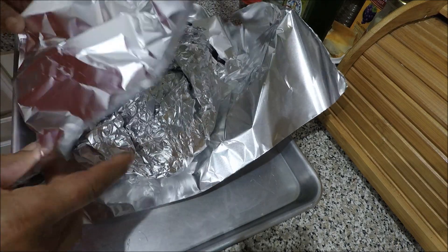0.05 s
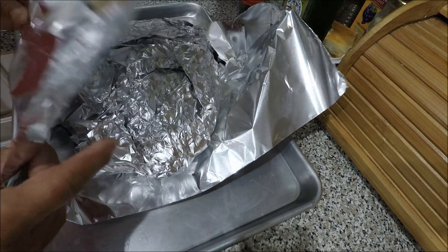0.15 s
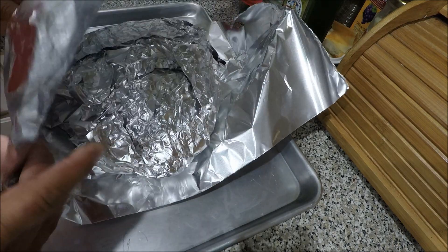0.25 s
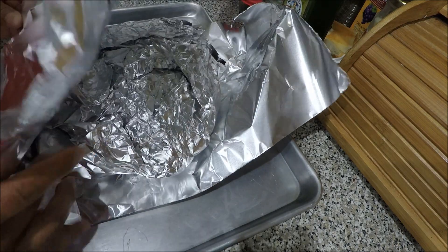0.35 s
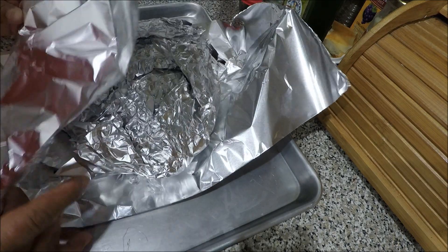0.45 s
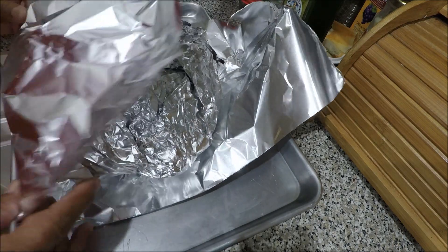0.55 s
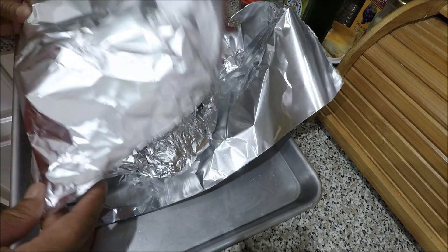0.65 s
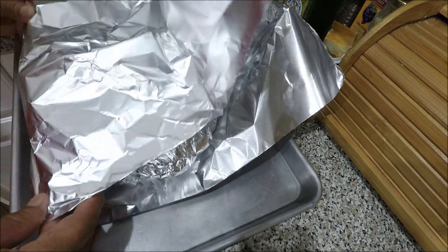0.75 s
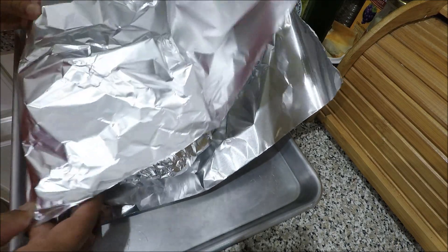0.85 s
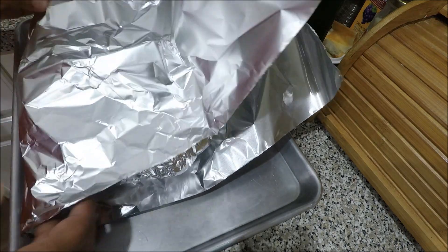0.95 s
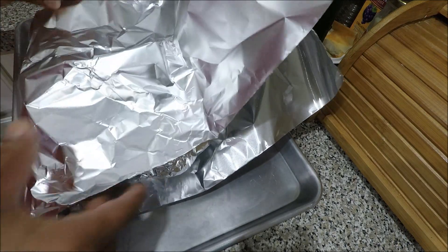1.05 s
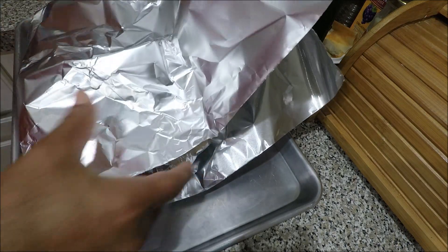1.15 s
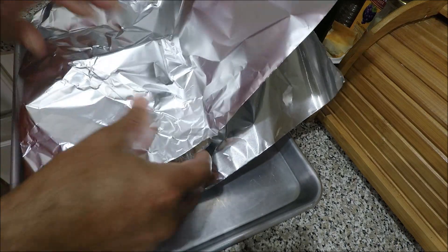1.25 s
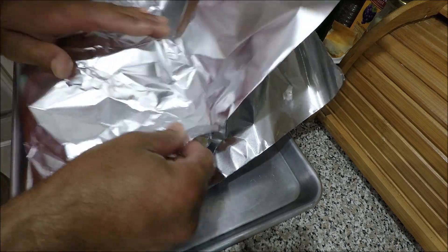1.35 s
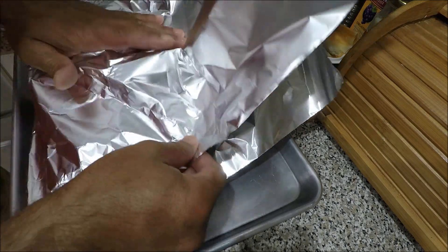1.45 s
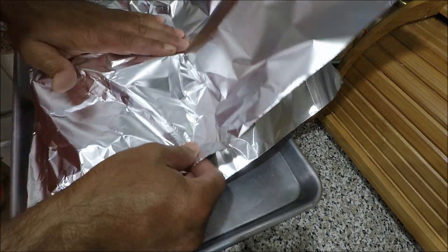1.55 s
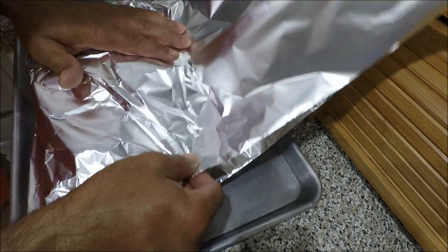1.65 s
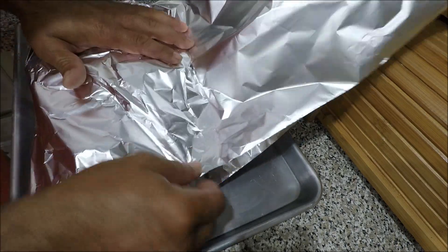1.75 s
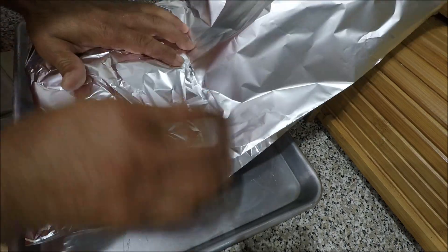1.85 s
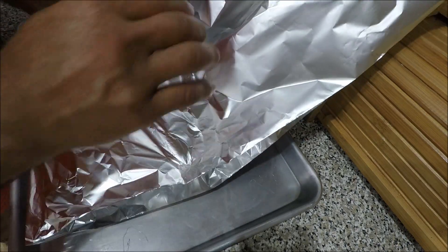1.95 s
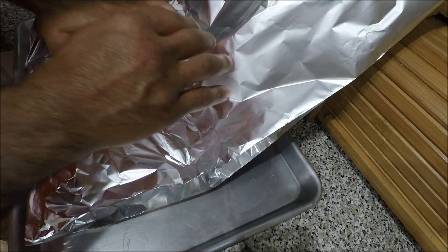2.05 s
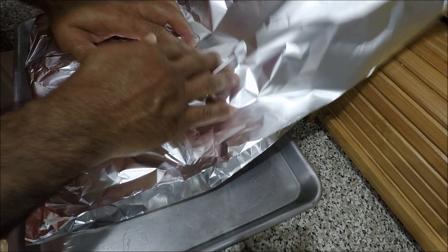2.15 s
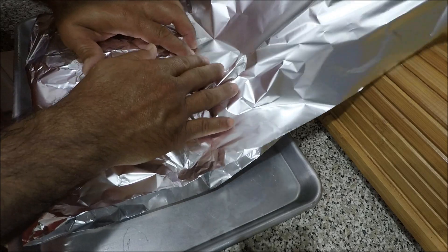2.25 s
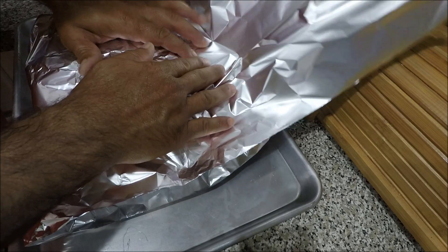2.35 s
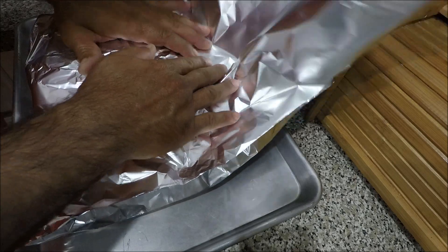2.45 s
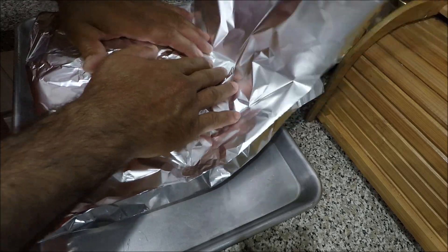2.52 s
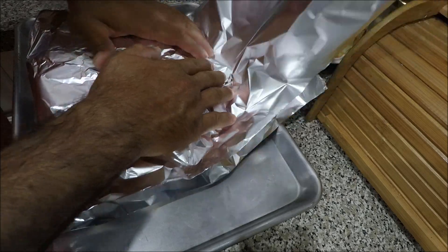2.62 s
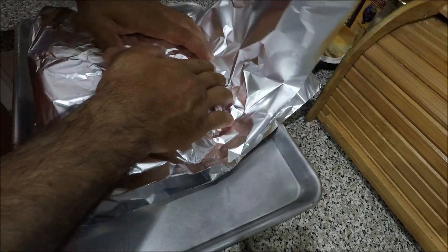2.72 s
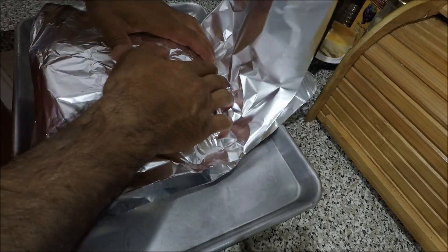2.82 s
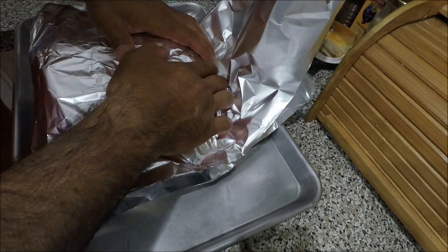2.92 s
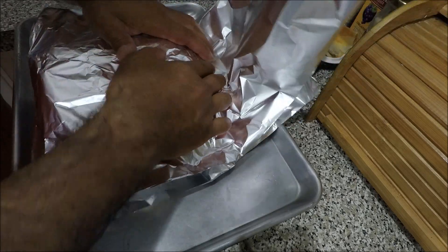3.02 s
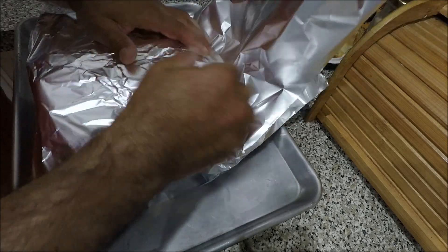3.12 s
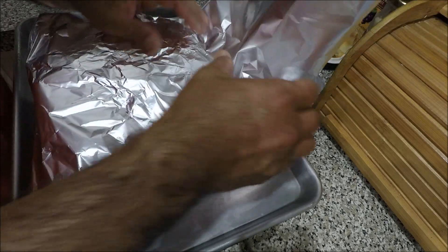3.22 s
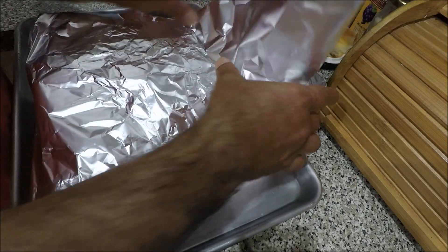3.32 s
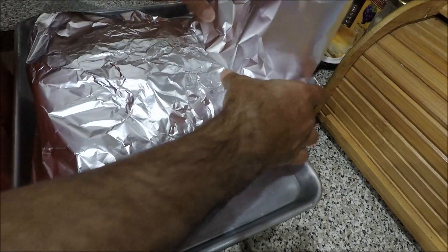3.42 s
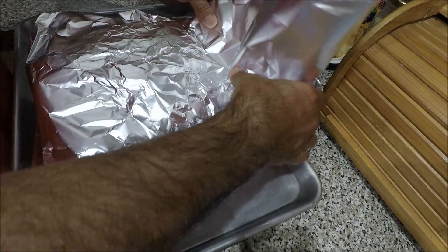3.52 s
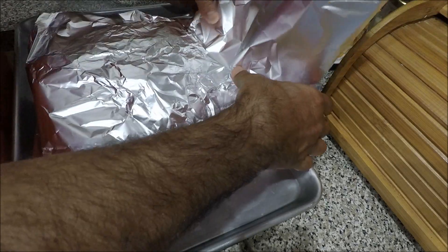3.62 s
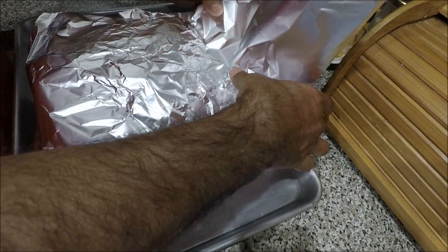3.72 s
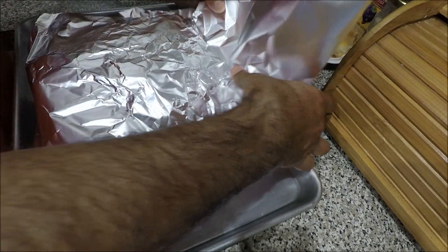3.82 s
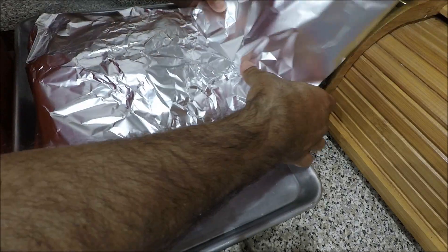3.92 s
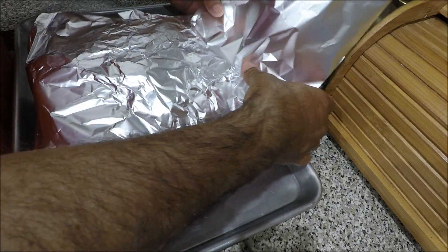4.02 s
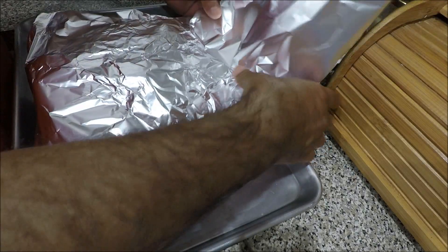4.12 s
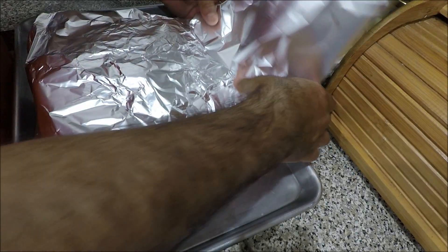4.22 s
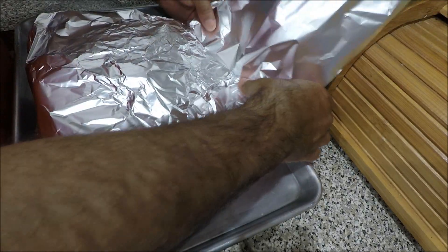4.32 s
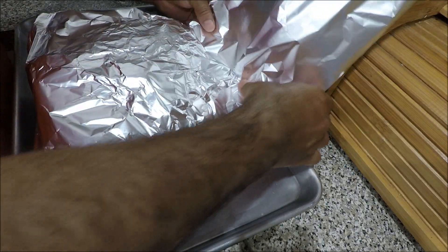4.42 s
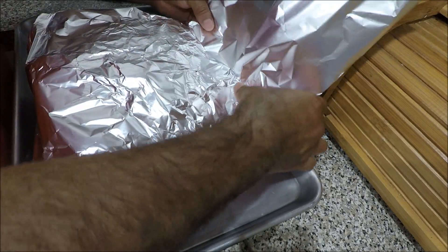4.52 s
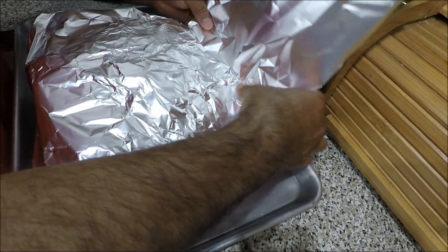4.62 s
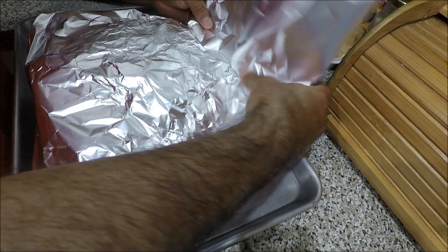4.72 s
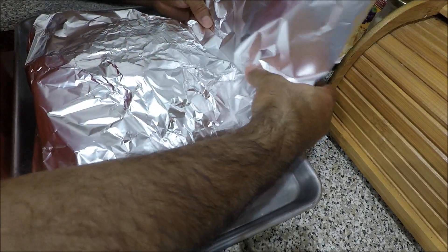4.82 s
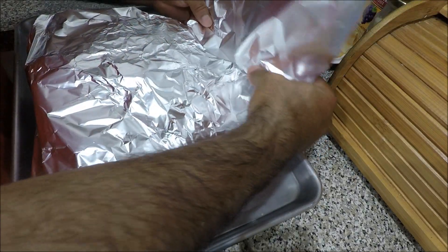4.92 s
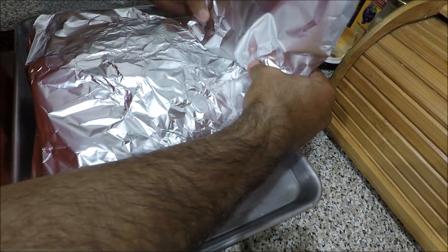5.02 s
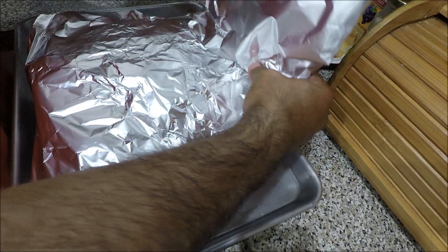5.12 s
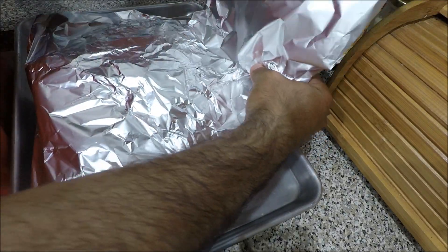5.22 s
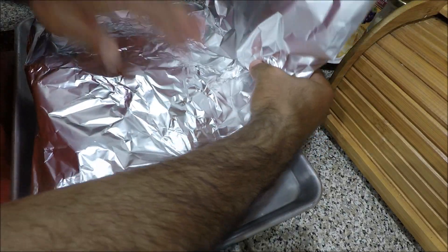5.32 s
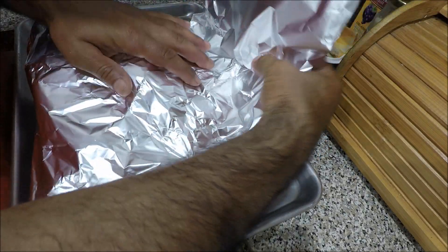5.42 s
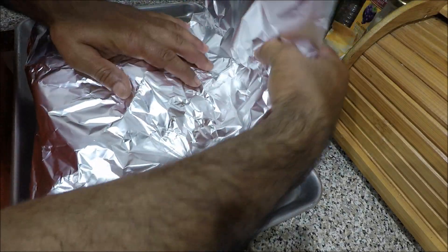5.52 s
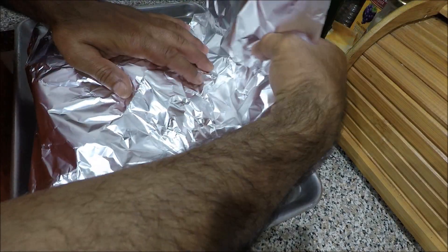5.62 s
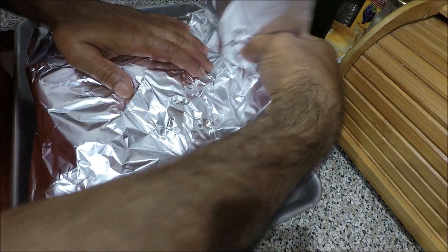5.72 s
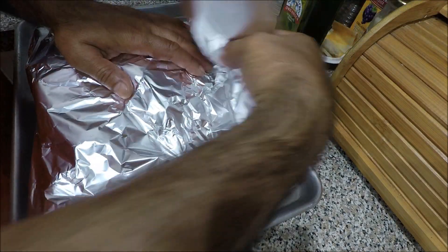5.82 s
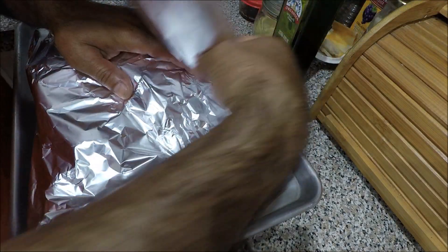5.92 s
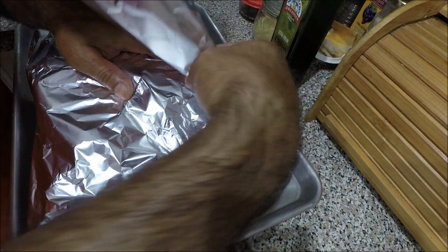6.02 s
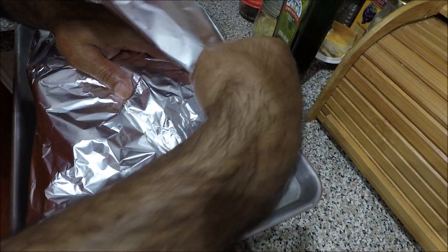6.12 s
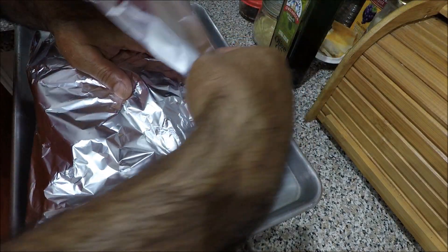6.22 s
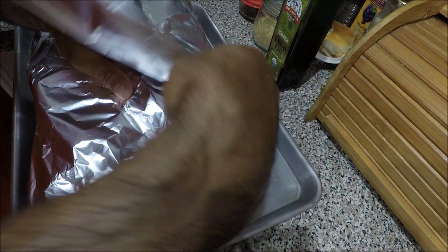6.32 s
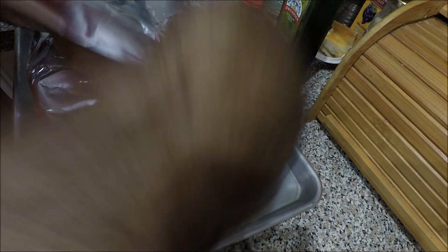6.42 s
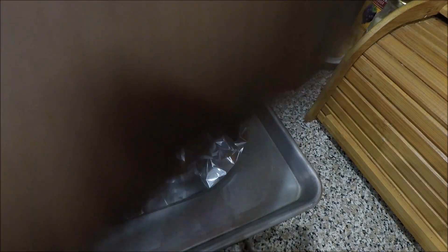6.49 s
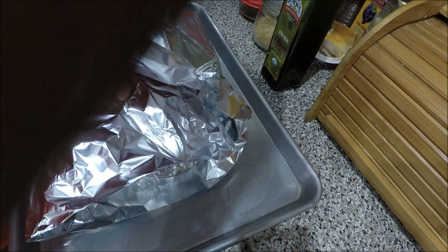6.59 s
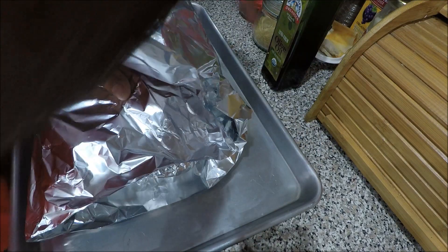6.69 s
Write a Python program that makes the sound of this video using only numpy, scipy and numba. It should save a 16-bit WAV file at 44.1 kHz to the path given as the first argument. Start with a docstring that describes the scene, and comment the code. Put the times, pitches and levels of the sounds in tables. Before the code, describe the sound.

Aluminium foil crinkles and crunches continuously in uneven squeezes, close by in a small kitchen, with faint knocks from the pan underneath.

```python
"""Crackling, crunching aluminium foil, folded and crimped by hand on a metal pan in a small kitchen.
Thousands of tiny creases buckle, and each one ticks and sets the sheet shivering. Large panels
flex with a lower rustle or pop inside out, and the pan thuds when pressed. The hard walls add
a short echo, and a faint room hum lies underneath."""
import sys
import numpy as np
from scipy import signal
from scipy.fft import rfft, irfft, next_fast_len
from scipy.io import wavfile
from scipy.ndimage import uniform_filter1d
from numba import njit

SR = 44100
rng = np.random.default_rng(int(sys.argv[2]) if len(sys.argv) > 2 else 0)


def wav_record(signal):
    """Record a signal, one row per channel, as 16-bit PCM in the file named by sys.argv[1]."""
    frames = np.transpose(np.atleast_2d(signal))
    bounded = np.clip(frames, -1, 1)
    # unit amplitude maps onto the largest positive 16-bit level
    quanta = np.round(bounded * 32767).astype(np.int16)
    wavfile.write(sys.argv[1], SR, quanta)


N = 297675

# A crease snaps and frees a run of buckles. Each row: start in seconds, peak level in dB.
CREASE_SNAPS = [(0.3728, -16), (0.624, -20), (0.6396, -13.5), (0.8623, -10.5), (1.1128, -17.5),
                (1.231, -17.5), (1.495, -15.5), (1.515, -11), (1.55, -17), (1.7626, -13.5), (1.945, -14.5),
                (2.247, -13.5), (2.5401, -10.5), (2.573, -18), (3.281, -21), (3.7915, -13.5),
                (4.084, -14.5), (4.227, -16.5), (4.4333, -17), (4.6243, -16.5), (4.645, -17), (4.8894, -15),
                (5.534, -10), (5.6573, -16), (5.758, -14), (5.8348, -17), (6.314, -18), (6.378, -17),]
# The bright tone of a fine crease. Each row: frequency in Hz, strength in dB.
CREASE_COLOUR = [(1500, -14.5), (2450, -14), (3050, -4.5), (3400, -8), (3650, -1), (3950, -7.5),
                 (4800, -4.5), (5400, -2.5), (6150, -0.5), (6450, -3), (7000, 1.5), (7800, -2),
                 (8100, -7.5), (10300, -12), (11500, -23.5), (14800, -27.5), (15600, -55)]
# The hollow tone of a large foil panel. Each row: frequency in Hz, strength in dB.
PANEL_COLOUR = [(100, -42), (145, -10), (190, -2), (310, -9), (480, -17), (830, 5), (1300, -8), (1560, 7),
                (1740, 9), (1900, 8), (2150, 5), (2450, -8), (3500, 0.5), (6000, -71)]


def foil():
    """Fine creases give the bright fizz, large panels the lower rustle; both follow the hands."""
    # How much the panels flex at medium creasing. Each row: time in seconds, level in dB.
    flexing = [(0, -35.5), (.55, -37.5), (.72, -33), (.9, -37.5), (1.82, -35), (2.3, -37), (2.7, -35),
               (3.1, -34), (4.2, -35), (4.9, -34.5), (5.5, -34.5), (6.75, -36)]
    # Changes to their rustle below 1000 Hz. Each row: time in seconds, boost or cut in dB.
    low_rustle = [(2.4, -2.5), (3.3, -4.5), (3.9, -6.5), (4.8, -4.5), (5.3, 4.5), (5.9, -3)]
    steady = creasing() * avalanche(per_s=37, clump_db=1.5)
    drive = np.sqrt(steady ** 2 + runs())
    effort = drive / gain_of(-30)  # 1 at medium creasing
    fine = crackle(drive, CREASE_COLOUR, per_s=2500, spread_db=3.0, tick_db=-8)
    lone_ticks = crackle(steady * gain_of(-15), CREASE_COLOUR, per_s=60, spread_db=3.5, tick_db=3)
    flex = gain_curve(flexing) * effort ** 0.91  # panels follow the creasing less steeply
    panels = crackle(flex, PANEL_COLOUR, per_s=900, spread_db=1.5, tick_db=12.0)
    fine = scale_band(fine, 8800, "highpass", effort ** 0.15)  # harder creasing is brighter
    return fine + lone_ticks + scale_band(panels, 1000, "lowpass", gain_curve(low_rustle))


def creasing():
    """Each squeeze grips quickly, swells or sags while held, and dies away when the fingers let go."""
    # Finger squeezes. Each row: start in seconds, length in seconds, level in dB, swell in dB.
    squeezes = [(0.038, 0.25, -35, 3.5), (0.31, 0.067, -27, 2), (0.388, 0.13, -37, 3),
                (0.586, 0.22, -28, 1), (0.839, 0.055, -20, -2.5), (0.903, 0.12, -23.5, -2.5),
                (1.104, 0.053, -23.5, -4.5), (1.223, 0.028, -28.5, -6.5), (1.353, 0.044, -20, -21.5),
                (1.472, 0.097, -29, 5), (1.547, 0.085, -17, -6), (1.624, 0.33, -28.5, 4.5),
                (2.022, 0.044, -38.5, 5), (2.238, 0.019, -20, -4), (2.263, 0.15, -29, 9),
                (2.492, 0.24, -28.5, 1.5), (2.749, 0.055, -20, -4), (2.819, 0.053, -22.5, -1),
                (2.904, 0.067, -38.5, 10), (3.044, 0.026, -32.5, -3), (3.136, 0.086, -34.5, 3.5),
                (3.237, 0.042, -25, -6.5), (3.34, 0.044, -30, -2), (3.468, 0.062, -26, 1),
                (3.561, 0.04, -25.5, -2.5), (3.671, 0.067, -24.5, -6.5), (3.777, 0.094, -25.5, -2),
                (3.891, 0.21, -28.5, 1), (4.072, 0.066, -20, -11.5), (4.135, 0.019, -24, 0.5),
                (4.22, 0.027, -34, -1), (4.355, 0.11, -29.5, 7), (4.489, 0.095, -31, 1.5),
                (4.623, 0.13, -27, -6.5), (4.763, 0.13, -29.5, 5), (4.93, 0.09, -20.5, -10),
                (5.028, 0.13, -37, 10), (5.273, 0.02, -32.5, 0.5), (5.416, 0.054, -34.5, 2),
                (5.492, 0.094, -23, -8.5), (5.565, 0.197, -46, 22), (5.804, 0.085, -25, -1.5),
                (5.887, 0.26, -29.5, 0), (6.194, 0.025, -25.5, 0), (6.277, 0.066, -26, -1.5),
                (6.438, 0.068, -35, 2), (6.556, 0.059, -30, -2.5)]
    # The foil settling between squeezes. Each row: time in seconds, level in dB.
    settling = [(0, -31), (1.0, -32.5), (1.3, -35.5), (1.47, -41.5), (1.7, -29), (2.2, -40), (2.6, -28.5),
                (3.3, -39), (4.3, -34.5), (5.0, -38), (6.0, -31), (6.6, -37), (6.75, -52.5)]
    grip_s, let_go_s = 0.021, 0.022
    t = np.arange(N) / SR
    power = gain_curve(settling) ** 2
    for start, length, level_db, swell_db in squeezes:
        since = t - start
        grip = np.clip(since / grip_s, 0, 1)
        held = gain_of(level_db + swell_db * np.clip(since / length, 0, 1))
        release = np.exp(-np.maximum(since - length, 0) / let_go_s)
        power += (grip * held * release) ** 2
    return np.sqrt(power)


def avalanche(per_s, clump_db):
    """One buckle frees its neighbours: bursts of activity that start fast and fade."""
    starts = rng.random(N) * (rng.random(N) < per_s / SR)
    fade = np.exp(-1 / (0.0052 * SR))
    activity = signal.lfilter([1], [1, -fade], starts - starts.mean())
    return gain_of(clump_db * np.tanh(evened(activity)))


def runs():
    """The power each snap adds to the creasing: a sudden start, a quick fade."""
    below_snap_db, fade_s = 11.5, 0.012
    starts = np.zeros(N)
    for start, peak_db in CREASE_SNAPS:
        starts[round(start * SR)] = gain_of(peak_db - below_snap_db) ** 2
    return signal.lfilter([1], [1, -np.exp(-2 / (fade_s * SR))], starts)


def crackle(drive, colour, per_s, spread_db, tick_db):
    """A random stream of buckles, many small and a few large, each on a random patch of foil."""
    patches = buckles(colour, tick_db, count=360)
    sizes = gain_of(spread_db * np.minimum(rng.exponential(1, N), 3.5))
    sizes *= rng.random(N) < per_s / SR
    which = rng.integers(0, len(patches), N)
    places = np.flatnonzero(sizes)
    mix = np.zeros((2, N + patches.shape[2]))
    add_buckles(mix, np.ascontiguousarray(patches), places, (evened(sizes) * drive)[places], which[places])
    patch_energy = np.mean(np.sum(patches ** 2, axis=2))
    return mix[:, :N] / np.sqrt(patch_energy)


def buckles(colour, tick_db, count):
    """A patch of foil buckles with a tick, then shivers at its own pitches."""
    # How long the sheet rings. Each row: frequency in Hz, seconds to fade by 60 dB.
    ring_times = [(150, 0.076), (1500, 0.049), (4000, 0.047), (10000, 0.039)]
    t = np.arange(2048) / SR
    noise = rfft(noise_pairs(count, len(t), colour))
    pitches = evened(uniform_filter1d(rng.standard_normal((count, 1, noise.shape[2])), size=18))
    shiver = fade_bands(irfft(noise * gain_of(4.5 * pitches)), ring_times)
    tick = 1 + gain_of(tick_db) * np.exp(-t / 0.00033)
    return shiver * tick * (1 - np.exp(-t / 0.00017))


@njit
def add_buckles(mix, patches, places, sizes, which):
    """Adds each chosen patch's sound to the mix at its place."""
    for k in range(len(places)):
        for side in range(2):
            mix[side, places[k]:places[k] + patches.shape[2]] += sizes[k] * patches[which[k], side]


def snaps():
    """A fold races along a crease for a few milliseconds, then the foil goes still."""
    t = np.arange(2048) / SR
    rise = 1 - np.exp(-t / 0.0007)
    fall = np.exp(-(t / 0.005) ** 2) + 0.12 * np.exp(-t / 0.012)
    return bursts(CREASE_SNAPS, rise * fall, noise_pairs(len(CREASE_SNAPS), len(t), CREASE_COLOUR))


def cracks():
    """A lone crease cracks: a bright click with the panel's hollow note and a faint shiver."""
    # Cracks with no run after them. Each row: start in seconds, peak level in dB.
    events = [(2.0412, -17), (2.1868, -17.5), (3.0362, -13), (3.0508, -18), (3.368, -16.5), (4.7328, -15),
              (5.2128, -12), (5.2935, -20), (5.3107, -16), (5.3926, -16), (6.4526, -13), (6.5655, -19)]
    crack_s, hollow_db = 0.002, -5
    t = np.arange(1024) / SR
    click = np.sqrt(t / crack_s) * np.exp(-(t / crack_s) ** 2)
    shiver = 0.3 * np.exp(-t / 0.006) * (t > crack_s)
    bright = noise_pairs(len(events), len(t), CREASE_COLOUR)
    hollow = noise_pairs(len(events), len(t), PANEL_COLOUR)
    return bursts(events, click + shiver, bright + gain_of(hollow_db) * hollow)


def pops():
    """A panel pops inside out: a short hollow note that sags in pitch as the panel settles."""
    # Each row: start in seconds, level in dB, starting pitch in Hz.
    events = [(0.743, -18, 1680), (0.868, -27, 1950), (0.975, -22, 1940), (1.8402, -17, 1570),
              (2.245, -24, 1500), (3.582, -19, 1650), (3.792, -21, 1870), (4.151, -17, 1640),
              (4.427, -16, 1700), (4.784, -18, 1040), (4.975, -18, 1280), (5.393, -24, 1010),
              (5.5044, -22, 1560), (5.7718, -18, 1860), (5.981, -17.5, 1670), (6.58, -18, 1950)]
    t = np.arange(800) / SR
    shape = np.exp(-t / 0.0019) * (1 - np.exp(-t / 0.00012))
    out = np.zeros(N + len(t))
    for start, level_db, hz in events:
        note = np.sin(2 * np.pi * hz * t * (1 - 8 * t))
        out[round(start * SR):][:len(t)] += gain_of(level_db) * note * shape
    return out[:N]


def glints():
    """The tightest creases give a short spray of very high fizz in hard crunches."""
    # Each row: start in seconds, peak level in dB.
    events = [(1.945, -22), (4.887, -16)]
    # The tone of the fizz. Each row: frequency in Hz, strength in dB.
    colour = [(8000, -41), (9800, 9), (11000, -5), (14500, -17)]
    glint_s = 0.0053
    t = np.arange(2048) / SR
    shape = t / glint_s * np.exp(-2 * t / glint_s)
    return bursts(events, shape, noise_pairs(len(events), len(t), colour))


def pan():
    """The pan gives under the hands: a dull ring of three tones, roughened as the pan scuffs."""
    # Each row: start in seconds, level in dB, pitch in Hz.
    thuds = [(0.322, -32, 189), (0.576, -28.5, 172), (0.619, -28, 193), (0.647, -26, 195),
             (1.767, -34, 186), (1.812, -26.5, 202), (2.245, -34, 192), (2.483, -33.5, 163),
             (3.374, -33, 252), (3.49, -22.5, 297), (4.327, -26, 200), (4.345, -25, 303),
             (4.385, -30.5, 181), (4.455, -37, 169), (5.527, -28, 192), (6.045, -32, 282),
             (6.424, -30, 253), (6.446, -33.5, 225)]
    roughness, ring_cycles = 0.4, 19  # a thud fades by 60 dB over this many cycles
    t = np.arange(6000) / SR
    noise = rng.standard_normal((len(thuds), 2, len(t)))
    scuffs = evened(uniform_filter1d(uniform_filter1d(noise, size=50), size=50))
    out = np.zeros((2, N + len(t)))
    for (start, level_db, hz), scuff in zip(thuds, scuffs):
        shape = gain_of(level_db - 60 * t * hz / ring_cycles) * (1 - np.exp(-(t / 0.003) ** 2))
        phase = 2 * np.pi * hz * t
        ring = np.sin(phase) + 0.49 * np.sin(1.6 * phase) + 0.2 * np.sin(2.9 * phase)
        out[:, round(start * SR):][:, :len(t)] += shape * ring * (1 + roughness * scuff)
    return out[:, :N]


def kitchen(x):
    """Hard walls send the sound back; four echo patterns fade in turn to avoid steady ringing."""
    # How long the echo lasts. Each row: frequency in Hz, seconds to fade by 60 dB.
    echo_times = [(150, 0.65), (1500, 1), (5000, 0.12), (12000, 0.18)]
    echoes = np.zeros((4, 2, SR // 2))
    delays = np.arange(220, SR // 2 - 20, 20)  # in samples, from 5 ms on
    delays = delays + rng.integers(0, 20, (4, 2, len(delays)))
    np.put_along_axis(echoes, delays, rng.choice([-1., 1.], delays.shape), 2)
    tails = fade_bands(echoes, echo_times)
    tails /= np.linalg.norm(tails[0, 0])
    turn = np.pi * (3 * np.arange(N) / SR + np.arange(4)[:, None] / 4)
    shares = np.cos(turn) * abs(np.cos(turn)) * np.sqrt(2 / 3)  # each returns with its sign flipped
    return sum(signal.oaconvolve(x * share, tail, axes=1)[:, :N] for share, tail in zip(shares, tails))


def room_hum():
    """The faint, steady, low noise of the room."""
    # Each row: frequency in Hz, strength in dB.
    colour = [(90, -69), (140, 2), (260, -1), (700, -11), (1500, -10.5), (7000, -36), (14000, -36)]
    return gain_of(-48) * noise_pairs(1, N + N % 2, colour)[0, :, :N]


def microphones(field):
    """Two close microphone openings hear mostly the same sound, each with its own lag and balance."""
    # Each row: frequency in Hz, how alike the two sides are from 0 to 1.
    likeness = [(120, 0.35), (400, 0.6), (800, .8), (1200, 0.6), (2400, 0.7), (3400, .93), (5000, .8),
                (7200, .7), (10400, 0.6), (15000, .8)]
    # Each row: frequency in Hz, how far the left side is ahead in radians.
    left_lead = [(100, .2), (600, 1.0), (860, 3.3), (1460, 7.2), (1890, 7.9), (2670, 12.7), (5680, 12.8),
                 (8790, 12.6), (15300, 12.6)]
    # Each row: frequency in Hz, how much louder the left side is in dB.
    balance = [(60, -1.0), (270, -1.0), (450, 0.5), (780, 5.5), (950, 0), (1250, -7.5), (1420, -6.5),
               (1700, 2), (2010, 5.5), (2200, 3.5), (2600, -1), (3620, -1.5), (4100, 1), (5500, 1.5),
               (9080, 0.0), (15000, -1.0)]
    size = next_fast_len(N + 4096)
    hz = np.fft.rfftfreq(size, 1 / SR)
    common, separate = rfft(field, size)
    alike = np.clip(value_at(likeness, hz), 0, 1)
    right = alike * common + np.sqrt(1 - alike ** 2) * separate
    lean = np.exp(.5j * value_at(left_lead, hz)) * gain_of(value_at(balance, hz) / 2)
    return irfft([common * lean, right / lean], size)[:, :N]


def gain_of(db):
    """Turns dB into a multiplier."""
    return 10 ** (np.asarray(db) / 20)


def gain_curve(points):
    """Joins rows of seconds and dB into one multiplier per sample."""
    return gain_of(np.interp(np.arange(N) / SR, *np.transpose(points)))


def evened(x):
    """Scales a signal to an average power of 1."""
    return x / np.sqrt(np.mean(x ** 2) + 1e-20)


def value_at(points, hz):
    """Reads between a table's rows, with frequency spaced by octaves."""
    row_hz, values = np.transpose(points)
    return np.interp(np.log(hz + 1), np.log(row_hz + 1), values)


def noise_pairs(count, size, colour):
    """Pairs of unrelated noises with the given tone, each `size` samples long."""
    hz = np.fft.rfftfreq(size, 1 / SR)
    white = rfft(rng.standard_normal((count, 2, size)))
    return evened(irfft(white * gain_of(value_at(colour, hz)), size))


def fade_bands(x, fade_times):
    """Lets each frequency band die away at its own speed."""
    hz, t, bands = signal.stft(x, SR, nperseg=128)
    fade = gain_of(-60 * t / value_at(fade_times, hz)[:, None])
    return signal.istft(bands * fade, SR, nperseg=128)[1][..., :x.shape[-1]]


def scale_band(x, edge_hz, side, gain):
    """Turns the part of a sound above or below an edge up and down over time."""
    part = signal.oaconvolve(x, signal.firwin(255, edge_hz, pass_zero=side, fs=SR)[None], "same")
    return x + (gain - 1) * part


def bursts(events, shape, noise):
    """Places one shaped burst of noise at each event, scaled to its peak level."""
    out = np.zeros((2, N + len(shape)))
    for (start, peak_db), burst in zip(events, noise * shape):
        out[:, round(start * SR):][:, :len(shape)] += gain_of(peak_db) * burst / abs(burst[0]).max()
    return out[:, :N]


def scene():
    """Foil and pan with their echo, over a faint room hum."""
    near = foil() + snaps() + cracks() + glints() + pops() + pan()
    return near + room_hum() + gain_of(-13.5) * kitchen(near)


def record(dry):
    """The microphones hear the scene; deep bass and the highest treble are cut away."""
    bass_hz, bass_cut_db, treble_hz = 130.2, 21.5, 15550
    bass_cut = signal.cheby2(10, bass_cut_db, bass_hz, "high", fs=SR, output="sos")
    treble_cut = signal.firwin(511, treble_hz, window=("kaiser", 9), fs=SR)
    thin = signal.sosfilt(bass_cut, microphones(dry))
    return signal.oaconvolve(thin, treble_cut[None], "same")


dry = scene()
out = record(dry)
wav_record(out)
```